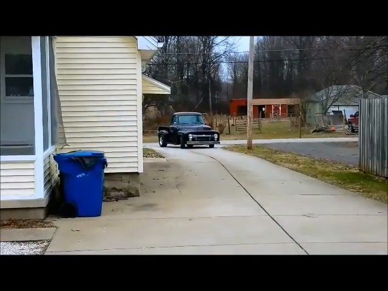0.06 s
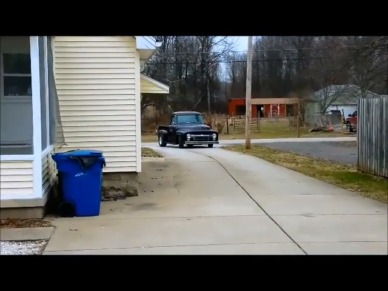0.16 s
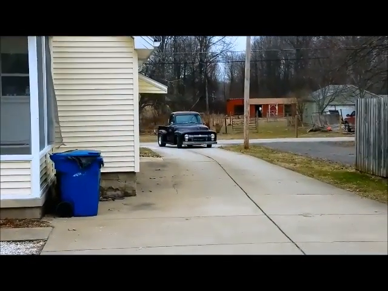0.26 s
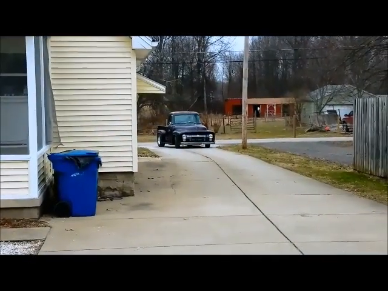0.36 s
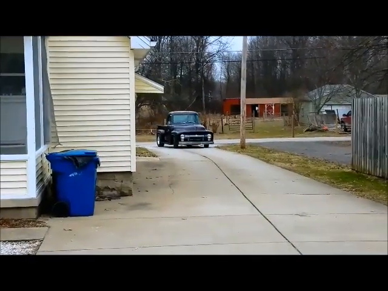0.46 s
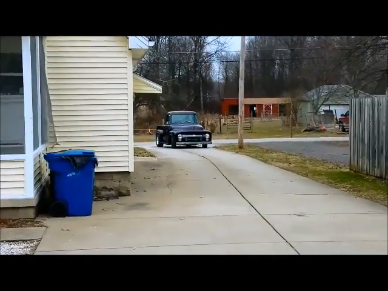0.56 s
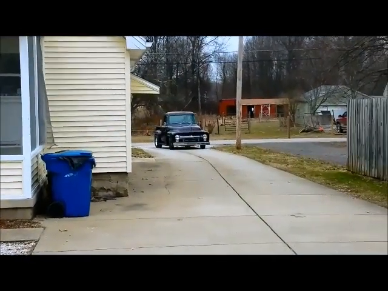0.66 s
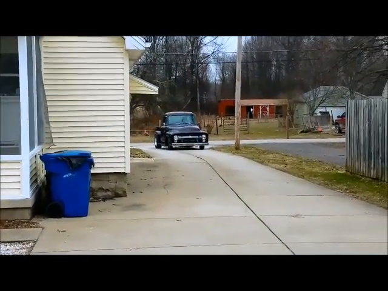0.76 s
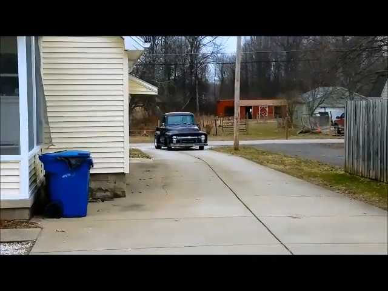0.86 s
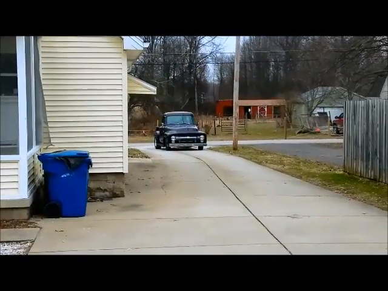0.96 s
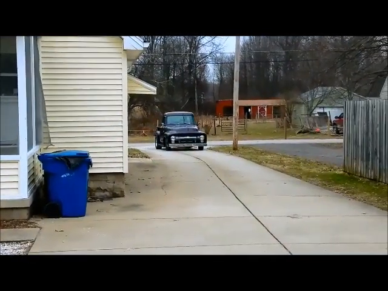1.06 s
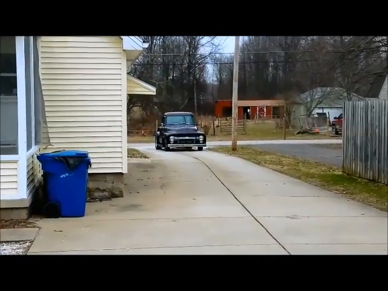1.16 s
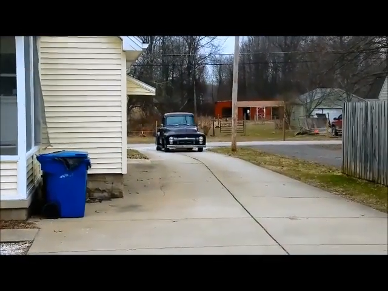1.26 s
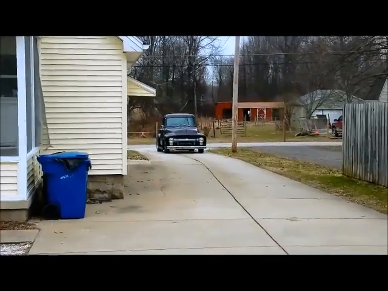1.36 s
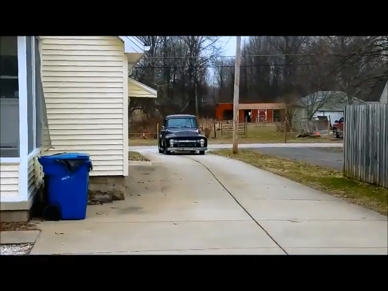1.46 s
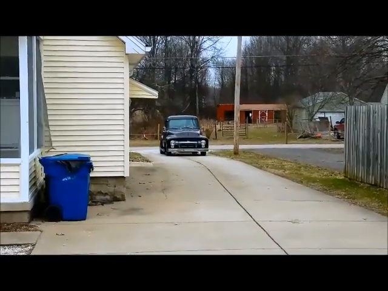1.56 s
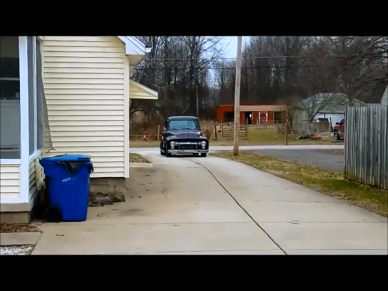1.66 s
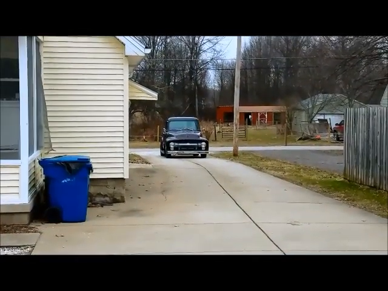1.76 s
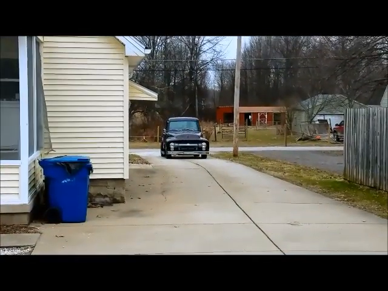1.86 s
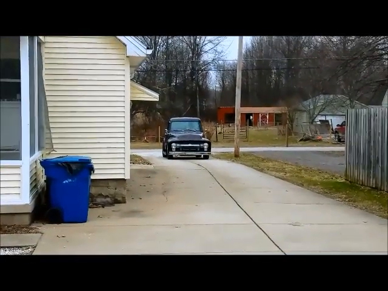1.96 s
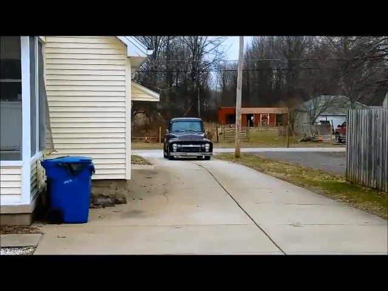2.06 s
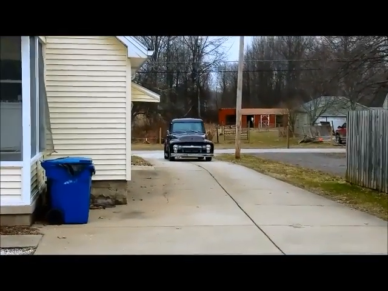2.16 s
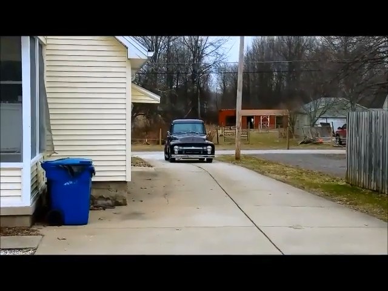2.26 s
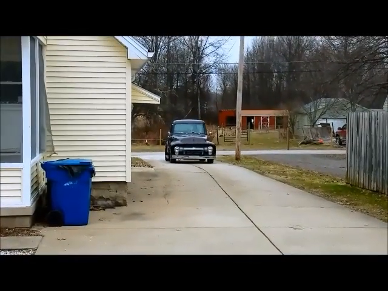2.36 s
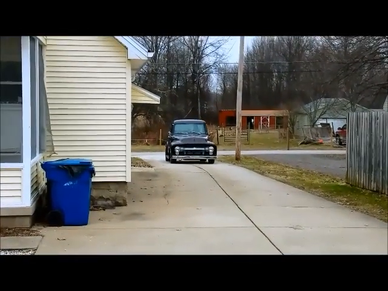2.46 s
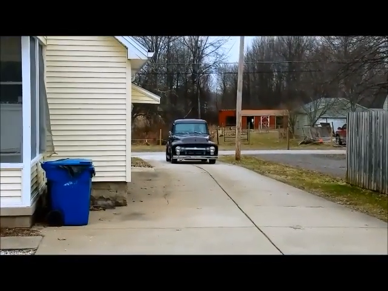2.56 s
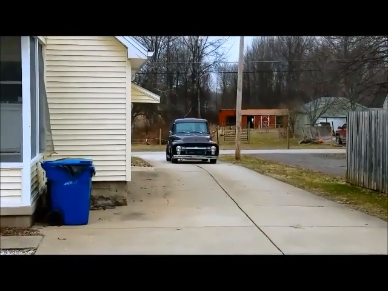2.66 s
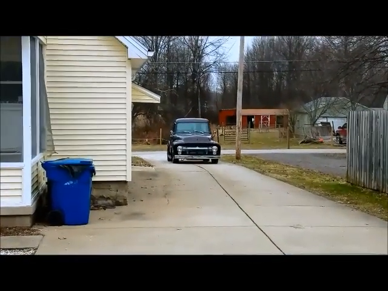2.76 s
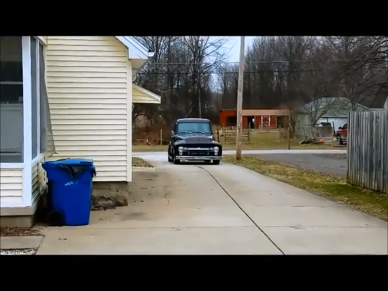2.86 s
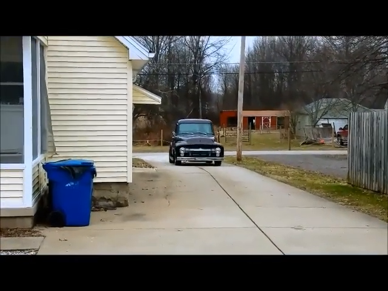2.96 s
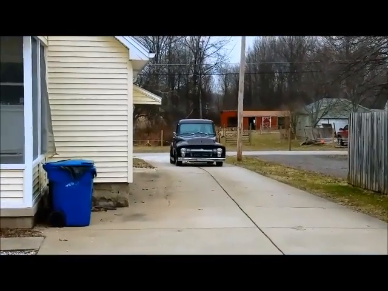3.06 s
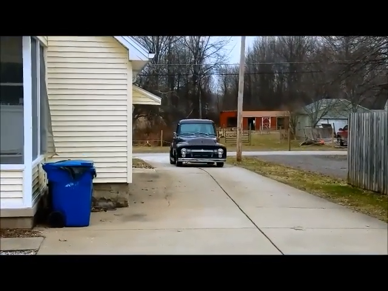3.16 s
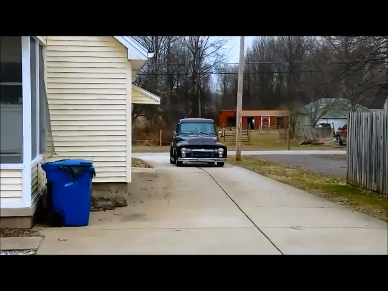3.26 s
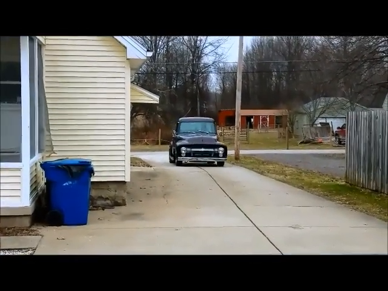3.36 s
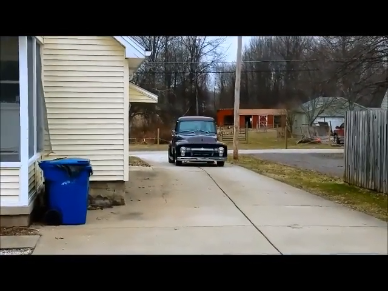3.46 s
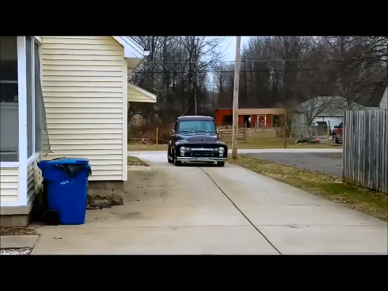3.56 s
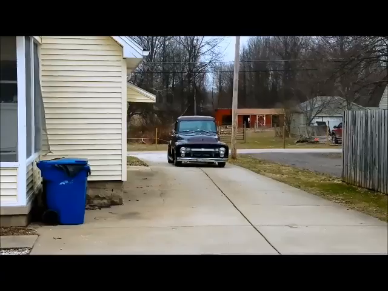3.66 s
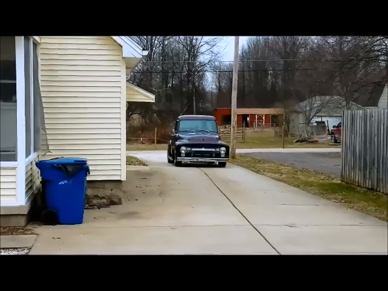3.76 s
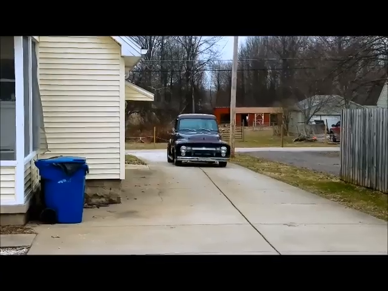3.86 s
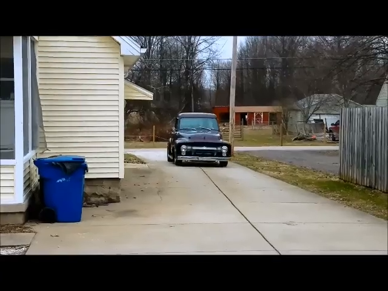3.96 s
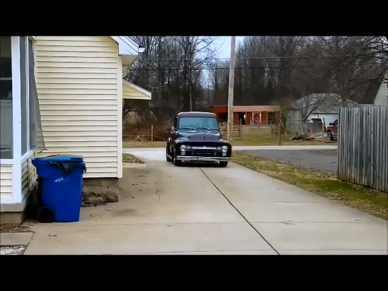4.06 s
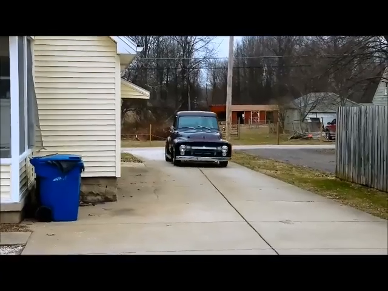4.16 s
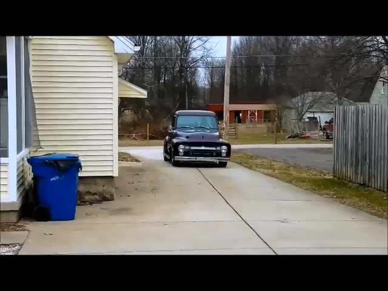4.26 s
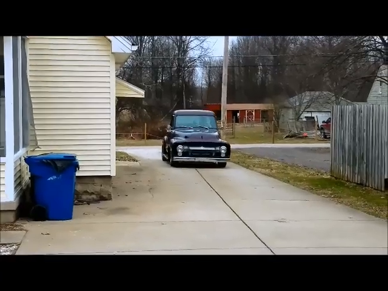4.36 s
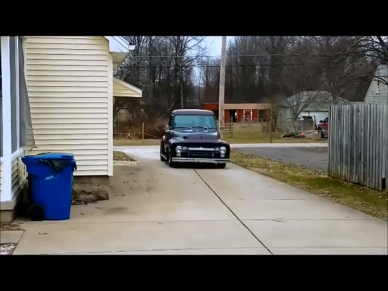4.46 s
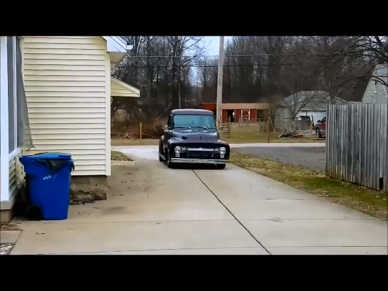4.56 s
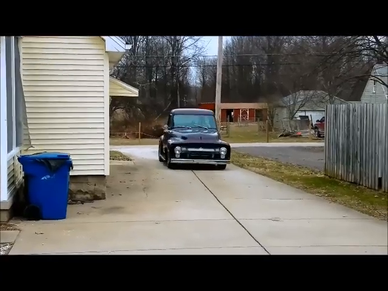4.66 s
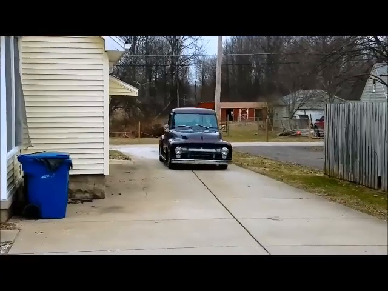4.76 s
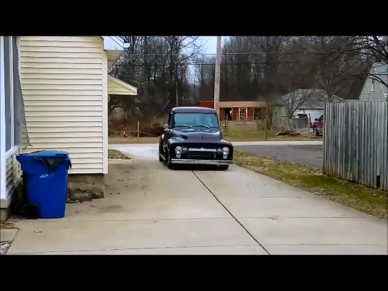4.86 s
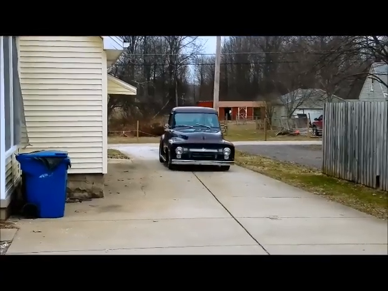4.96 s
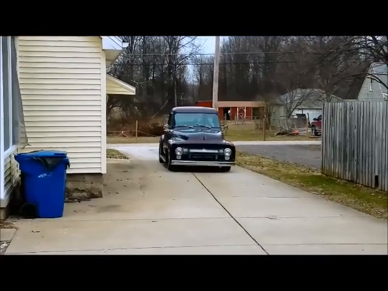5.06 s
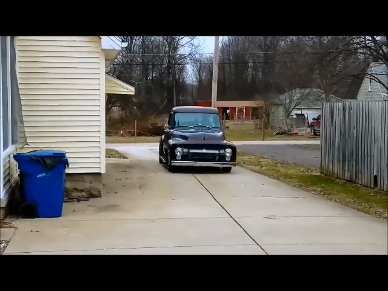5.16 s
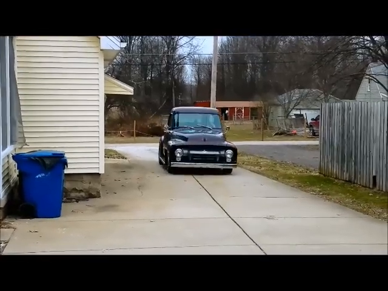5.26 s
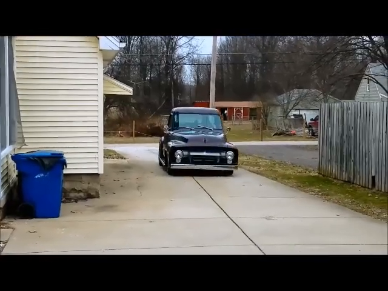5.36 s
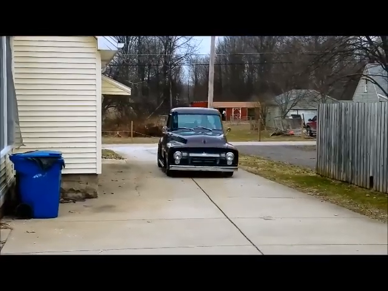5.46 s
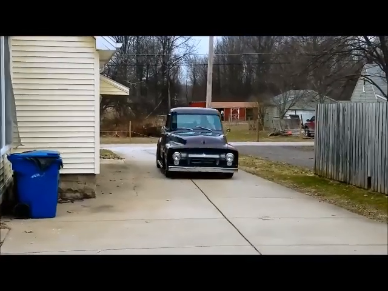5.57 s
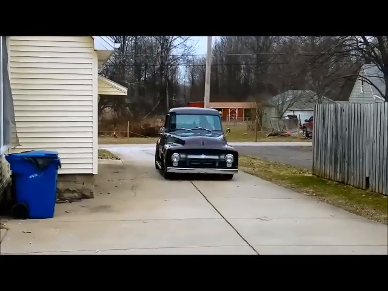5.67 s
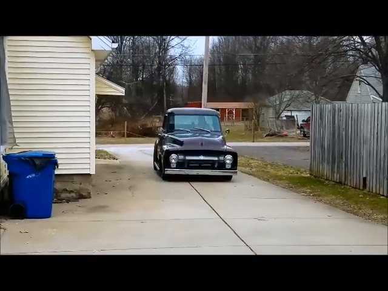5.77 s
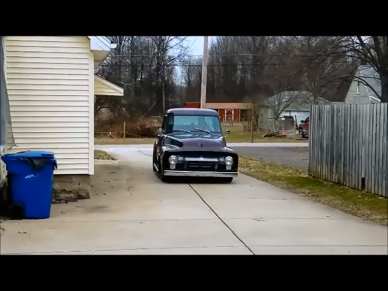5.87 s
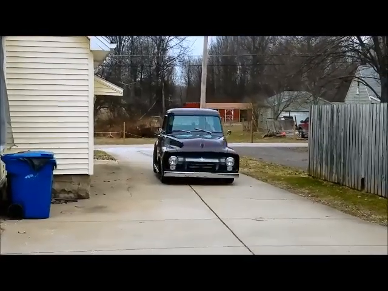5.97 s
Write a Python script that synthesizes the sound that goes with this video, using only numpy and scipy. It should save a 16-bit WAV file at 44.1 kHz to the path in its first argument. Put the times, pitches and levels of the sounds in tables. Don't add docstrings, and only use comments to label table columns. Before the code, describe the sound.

Deep uneven truck exhaust eases off, picks up and rolls closer over gritty concrete, a stone clicks early, and the throttle shuts with dull booms.

```python
import sys
import numpy as np
from scipy import signal
from scipy.fft import rfft, irfft, next_fast_len
from scipy.io import wavfile

SR = 44100
rng = np.random.default_rng(int(sys.argv[2]) if len(sys.argv) > 2 else 0)


def wav_out(sig):
    wavfile.write(sys.argv[1], SR, np.round(np.clip(np.atleast_2d(sig).T, -1, 1) * 32767).astype(np.int16))


def gain_from_db(level_db):
    decades = np.asarray(level_db, float) / 20
    return 10 ** decades


N = 265041

# (time [s], firing rate [1/s])
FIRING_RATE = [(0.0, 87.1), (0.2, 85.4), (0.4, 81.6), (0.8, 72.7), (1.0, 69.7), (1.2, 71.0), (1.4, 75.9),
               (1.8, 78.4), (2.0, 81.8), (2.8, 87.7), (3.4, 91.0), (4.0, 93.8), (4.5, 95.7), (5.29, 94.8),
               (5.4, 89.3), (5.5, 86.8), (5.7, 89.4), (6.0, 85.9)]
DISTANCE_M, ROLL_M_PER_S = 30, 2.6
THROTTLE_SHUT_S, THROTTLE_SPAN_S = 5.36, .08
COAST_END_S, COAST_SPAN_S = 1.47, 0.34

# (multiple of cycle rate [-], level [dB], change once the throttle shuts [dB])
CYCLE_HARMONICS = [(4, -7.1, 3.7), (5, -10.1, 8.9), (6, 3.2, 13.3), (7, -1.8, 6.5), (8, -0.0, -0.5),
                   (9, 2.8, -4.0), (10, 0.8, 1.8), (11, 4.1, 2.5), (12, 0.5, -8.3), (13, 5.9, 2.4),
                   (14, 6.1, 0.6), (15, 3.1, -9.8), (16, 4.4, 0.2), (17, 3.6, 2.8), (18, 0.7, -6.4),
                   (19, -0.9, -7.2), (20, -1.3, -0.8), (21, 5.9, -3.2), (22, 1.0, 3.5), (23, 1.3, -7.6),
                   (24, -4.4, 0.9), (25, -2.4, 1.5), (26, -3.3, -2.9), (27, -2.3, -1.4), (28, -4.3, 4.5),
                   (29, -2.6, -2.4), (30, -3.1, 2.3)]
CYLINDER_PUSH = [1.0, .3, 1.0, .35, .3, 1.0, .25, .3]
# (frequency [Hz], level [dB])
PIPE_RESPONSE = [(40, -8.3), (62, -8.2), (100, -0.7), (112, -5.0), (125, 7.6), (135, 8.9), (146, 6.3),
                 (158, 2.6), (172, 6.7), (188, 1.8), (205, 6.6), (225, -0.2), (260, -2.2), (360, -16.0)]
# (time [s], firing tone level [dB], bank burble level [dB])
EXHAUST_LEVELS = [(0.1, -45, -47.5), (0.4, -24.5, -49), (0.65, -23.5, -55), (0.85, -26.5, -50),
                  (1.0, -26, -48), (1.3, -26, -48.5), (1.66, -14.5, -46.5), (2.05, -23.5, -43.5),
                  (2.5, -27, -42), (2.65, -38, -41), (2.95, -26.5, -40.5), (3.2, -28, -43),
                  (3.55, -17.5, -45.5), (3.9, -20, -40), (4.4, -19.5, -36), (5.28, -18, -36),
                  (5.53, -24.5, -40), (5.7, -21.5, -38.5)]
# (firing rate [1/s], level [dB])
OVERTONE_FAVOUR = [(70, -53), (77, -35), (79, -36.5), (81.5, -42.5), (89.8, -50), (91.6, -36.5), (94, -37),
                   (95.4, -61)]
COAST_DB, OVERRUN_DB = -10.5, 5.5
UNEVEN_MIN_DB, UNEVEN_MAX_DB, UNEVEN_OVERRUN_DB = -51.5, -43, 5
STRONG_SPREAD, WEAK_SPREAD = .015, .31
ECHO_SHARE = .32
ECHO_MS, ECHO_CLOSES, ECHO_CLOSES_FASTER = 37.95, .535, .1215

# (frequency [Hz], width [Hz], level [dB])
RUMBLE_MODES = [(85, 30, -10), (135, 40, 0), (195, 60, -2), (260, 60, -12)]
RUMBLE_DB, RUMBLE_TRIM_DB, STUMBLE_DB_PER_S = -41.5, -1.5, 32
# (time [s], peak level [dB])
STUMBLES = [
    (1.68, -32),
    (3.2, -31),
    (4.25, -28),
    (5.75, -28),
]

FAN_PARTIALS = [12, 5.5, -8]
FAN_HZ = 252.7
FAN_START_DB, FAN_FOLLOWS, FAN_STEP_DB, FAN_STEP_S = -63, 0.84, 9, 2.07

# (frequency [Hz], level [dB per Hz])
BAY_SPECTRUM = [(150, -24.5), (260, -3.5), (298, -7.5), (371, -14.5), (455, -8), (505, -13), (579, -14),
                (687, -17), (1250, -23), (1400, -22), (1640, -26.5), (2180, -28), (3150, -32.5),
                (4000, -37), (5200, -72), (8800, -120)]
# (frequency [Hz], width [Hz], level [dB])
PANELS = [(705, 12.5, 0), (1335, 25, -6.5), (2215, 40, -10)]
BAY_DB, BAY_FOLLOWS = -42, 0.94

# (frequency [Hz], level [dB per Hz])
HISS_SPECTRUM = [(880, -53.5), (1500, 1), (1640, -6.5), (2160, -2), (2340, -7.5), (2500, -3.5), (2900, -6),
                 (3140, -5), (4180, -16.5), (5680, -11.5), (6980, -22.5), (8090, -19.5), (9480, -21.5),
                 (14900, -22.5), (15800, -20)]
# (frequency [Hz], level [dB per Hz])
GRIT_NEAR = [(880, -33), (1500, -12.5), (1710, -20), (2200, -2.5), (2760, -2), (2990, -5), (3500, -1),
             (3860, -4.5), (5730, -3), (6980, -19.5), (8500, -13.5), (14900, -15.5), (15800, -19)]
# (frequency [Hz], level [dB per Hz])
GRIT_FAR = [(880, -31), (1500, -9.5), (1610, -14), (1830, -3), (2410, -1), (3050, -8.5), (3540, -3),
            (4440, -9), (5460, -8.5), (6780, -23), (7630, -21.5), (11500, -27), (15800, -22)]
# (time [s], peak level [dB], hold [s])
SCUFFS = [(0.035, -57, 0.27), (0.465, -53, 0.034), (0.602, -56, 0.039), (0.712, -55.5, 0.11),
          (1.008, -60.5, 0.1), (1.653, -60, 0.045), (2.61, -57.5, .03), (3.283, -53.5, 0.059),
          (4.107, -51.5, 0.017), (4.222, -52, .05), (4.4, -51, 0.036), (4.637, -48.5, 0.032),
          (4.837, -50.5, 0.05), (4.923, -46, 0.019), (5.13, -47, 0.042), (5.509, -46, 0.034)]
ON_CONCRETE_S = 1.7
HISS_DB, HISS_RISE_DB, HISS_RISE_S, HISS_SPAN_S = -62.5, 9, 3.38, 2.25
GRIT_BED_DB, SCUFF_RISE_DB_PER_S, SCUFF_FALL_DB_PER_S = 0.7, 300, 129

# (delay [ms], share [-])
WALL_RETURNS = [(3.5, 0.13), (6.8, -0.16), (12.6, 0.086)]
RETURN_SWAY = .025

# (frequency [Hz], level [dB per Hz])
AIR_SPECTRUM = [(8, -9), (25, -6), (45, -12), (70, 8)]
AIR_DB = -48.5

# (time [s], peak level [dB], frequency [Hz], left-right [dB], body level [dB])
STONE_SNAPS = [(0.818, -42.5, 2400, 0.5, -12), (0.9967, -26, 2800, 3, -15), (1.0239, -28, 2700, 1, -5),
               (1.032, -36, 3100, -1, -8), (1.0612, -39, 2900, -2, -14), (1.1636, -37, 3270, -1, 2),
               (1.1636, -39, 6000, -6, -20), (1.167, -37, 3300, -6, -10), (1.194, -38, 3200, 0, -12),
               (2.5571, -36, 2430, 1, -17), (3.6204, -40, 2200, 6, 0), (4.9794, -41, 2730, -11, -10),
               (5.739, -44, 2610, 1.0, -10)]
SNAP_WIDTH = 0.41

# (time [s], peak level [dB], frequency [Hz])
LATE_BURNS = [
    (5.362, -19, 150),
    (5.392, -19, 160),
    (5.452, -16, 165),
]

# (frequency [Hz], left-right correlation [-])
PORT_LIKENESS = [(60, 0.39), (130, 0.76), (290, 0.93), (640, 0.94), (1410, 0.25), (3100, 0.84),
                 (6820, -0.29), (15000, -0.031)]
# (frequency [Hz], left-right [dB])
PORT_BALANCE = [(60, -2), (110, -3), (200, -1.5), (380, -2), (700, -2.5), (1290, 0), (2380, 4), (4400, -7),
                (8120, -4.5), (15000, 4.5)]
LEFT_LAG_S = 6e-5
STOP_S = .003


def in_time(rows):
    s, *columns = np.transpose(rows)
    return [np.interp(np.arange(N) / SR, s, column) for column in columns]


def at_hz(points, hz):
    x, y = np.array(points).T
    return np.interp(np.log(hz), np.log(x), y)


def ramp(middle_s, span_s):
    return np.clip((np.arange(N) / SR - middle_s) / span_s + .5, 0, 1)


def swells(bed_db, rows, rise, fall):
    t = np.arange(N) / SR
    for s, peak_db, *hold in rows:
        before = np.maximum(s - t, 0)
        after = np.maximum(t - s - sum(hold), 0)
        bed_db = np.maximum(bed_db, peak_db - rise * before - fall * after)
    return bed_db


def rms_one(x):
    return x / np.sqrt(np.mean(x ** 2) + 1e-20)


def drift(rate):
    r = np.exp(-80 * np.pi * rate / SR)
    coarse = rng.standard_normal(N // 40 + 2002)
    slow = signal.lfilter([1], [1, -2 * r, r * r], coarse)[2000:]
    return np.interp(np.arange(N) / 40, np.arange(len(slow)), rms_one(slow))


def resonance(x, hz, width_hz):
    r = np.exp(-np.pi * width_hz / SR)
    poles = [1, -2 * r * np.cos(2 * np.pi * hz / SR), r * r]
    return signal.lfilter([(1 - r * r) / 2, 0, (r * r - 1) / 2], poles, x)


def coloured(spectrum, grain_db):
    size = next_fast_len(N)
    hz = np.maximum(np.arange(size // 2 + 1) * SR / size, 1)
    sizes = gain_from_db(grain_db * np.minimum(rng.exponential(1, size), 4))
    mid, side = rfft(rng.standard_normal((2, size)) * sizes)
    alike = np.clip(at_hz(PORT_LIKENESS, hz), -1, 1)
    pair = np.sqrt(1 + alike) * mid + np.sqrt(1 - alike) * side * [[1], [-1]]
    inside = (hz > spectrum[0][0]) & (hz < spectrum[-1][0])
    return rms_one(irfft(pair * gain_from_db(at_hz(spectrum, hz)) * inside, size)[:, :N])


def exhaust(rate, firing_db, overtone_db, burble_db, uneven_db):
    t = np.arange(N) / SR
    turn = 2 * np.pi * (np.cumsum(rate / 8) / SR + .27)
    shut = ramp(THROTTLE_SHUT_S, THROTTLE_SPAN_S)
    echo_s = (ECHO_MS - ECHO_CLOSES * t - ECHO_CLOSES_FASTER * t ** 2) / 1000
    families = {0: overtone_db, 3: burble_db, 5: burble_db}
    out = np.zeros(N)
    for k, open_db, overrun_db in CYCLE_HARMONICS:
        hz = k * rate / 8
        family_db = firing_db if k == 8 else families.get(k % 8, uneven_db)
        pattern = np.sum(CYLINDER_PUSH * np.exp(-2j * np.pi * k * np.arange(8) / 8))
        weak = int(k % 8 not in families)
        wander_db = (.7 + 1.6 * weak) * drift(3.0)
        slip = (.1 + .18 * weak) * drift(2.0)
        level_db = open_db + shut * overrun_db + family_db + at_hz(PIPE_RESPONSE, hz)
        level_db = level_db + wander_db + 0.13 * (k > 9)
        both = np.abs(1 + (k > 8) * ECHO_SHARE * np.exp(2j * np.pi * hz * echo_s))
        spread = WEAK_SPREAD if weak else STRONG_SPREAD
        phase = k * turn + np.angle(pattern) - spread * (k - 8) ** 2 + slip
        out += np.sqrt(2) * gain_from_db(level_db) * both * np.cos(phase)
    return out


def rumble(rate, level_db):
    fired = np.diff(np.floor(np.cumsum(rate) / SR), prepend=0)
    puffs = fired * rng.standard_normal(N) + 0.052 * rng.standard_normal(N)
    rings = np.zeros(N)
    for k, (hz, width_hz, db) in enumerate(RUMBLE_MODES):
        ring = resonance(resonance(puffs, hz, width_hz * 2.0), hz, width_hz * 2.0)
        rings += gain_from_db(db) * (-1) ** k * ring
    return gain_from_db(level_db + RUMBLE_TRIM_DB) * rms_one(rings / rate ** .5)


def fan(level_db):
    t = np.arange(N) / SR
    out = np.zeros(N)
    for k, db in enumerate(FAN_PARTIALS, start=1):
        level = np.sqrt(2) * gain_from_db(level_db + db + .7 * drift(4.0))
        out += level * np.cos(2 * np.pi * FAN_HZ * k * t + .06 * drift(3.0))
    return out


def engine_bay(rate, bay_db):
    throb = 1 + 0.035 * np.cos(2 * np.pi * np.cumsum(rate * 3 / 8) / SR)
    rush = gain_from_db(bay_db + 1.24 * drift(26)) * throb * coloured(BAY_SPECTRUM, grain_db=3.0)
    return rush + sum(gain_from_db(db) * resonance(rush, hz, width_hz) for hz, width_hz, db in PANELS)


def tyres(hiss_db):
    total_db = swells(hiss_db + GRIT_BED_DB, SCUFFS, SCUFF_RISE_DB_PER_S, SCUFF_FALL_DB_PER_S)
    grit = np.sqrt(np.maximum(gain_from_db(2 * total_db) - gain_from_db(2 * hiss_db - 1.5), 0))
    shimmer = gain_from_db(.6 * drift(20))
    hiss = gain_from_db(hiss_db + 7.0) * shimmer * coloured(HISS_SPECTRUM, grain_db=1.0)
    flicker = gain_from_db(1.1 * drift(60))
    far = np.arange(N) / SR < ON_CONCRETE_S
    far_grains = gain_from_db(2.5) * coloured(GRIT_FAR, grain_db=1.5)
    grains = np.where(far, far_grains, coloured(GRIT_NEAR, grain_db=1.5))
    return hiss + grit * gain_from_db(5.0) * flicker * grains


def nearby_walls(x):
    i = np.arange(N)
    out = x
    for ms, share in WALL_RETURNS:
        lag = ms * SR / 1000 * (1 + RETURN_SWAY * drift(.5))
        out = out + share * x[:, np.maximum(i - lag, 0).astype(int)]
    return out


def low_air(bay_db):
    return gain_from_db(AIR_DB + .8 * (bay_db + 40)) * coloured(AIR_SPECTRUM, grain_db=0)


def stones():
    out, length = np.zeros((2, N)), 600
    for s, peak_db, hz, pan_db, body_db in STONE_SNAPS:
        click = np.zeros(length)
        click[[0, 75]] = 1, .25
        bright = resonance(resonance(click, hz, SNAP_WIDTH * hz), hz, SNAP_WIDTH * hz)
        body = resonance(resonance(click, 1300, 900), 1300, 900)
        ring = bright / np.abs(bright).max() - gain_from_db(body_db) * body / np.abs(body).max()
        i = round(s * SR)
        out[:, i:i + length] -= gain_from_db(peak_db) * ring * gain_from_db([[pan_db / 2], [-pan_db / 2]])
    return out


def pops():
    out, t = np.zeros(N), np.arange(2600) / SR
    envelope = (t / 0.0075) * np.exp(1 - t / 0.0095)
    for s, peak_db, hz in LATE_BURNS:
        i = round(s * SR)
        out[i:i + len(t)] += gain_from_db(peak_db) * np.sin(2 * np.pi * hz * t) * envelope
    return out


def scene():
    rate, = in_time(FIRING_RATE)
    firing_db, burble_db = in_time(EXHAUST_LEVELS)
    distance_m = DISTANCE_M - ROLL_M_PER_S * np.arange(N) / SR
    near_db = 20 * np.log10(DISTANCE_M / distance_m)
    shut = ramp(THROTTLE_SHUT_S, THROTTLE_SPAN_S)
    coasting = 1 - ramp(COAST_END_S, COAST_SPAN_S)
    overtone_db = at_hz(OVERTONE_FAVOUR, rate) + near_db + COAST_DB * coasting + OVERRUN_DB * shut
    uneven_db = np.clip(burble_db, UNEVEN_MIN_DB, UNEVEN_MAX_DB) + UNEVEN_OVERRUN_DB * shut
    rumble_db = swells(RUMBLE_DB + 0.47 * near_db, STUMBLES, STUMBLE_DB_PER_S, STUMBLE_DB_PER_S)
    fan_db = FAN_START_DB + FAN_FOLLOWS * near_db + FAN_STEP_DB * ramp(FAN_STEP_S, 0.2)
    bay_db = BAY_DB + BAY_FOLLOWS * near_db
    hiss_db = HISS_DB + HISS_RISE_DB * ramp(HISS_RISE_S, HISS_SPAN_S)

    engine = exhaust(rate, firing_db, overtone_db, burble_db, uneven_db)
    engine = engine + rumble(rate, rumble_db) + fan(fan_db) + pops()
    rush = nearby_walls(engine_bay(rate, bay_db) + tyres(hiss_db))
    return engine + rush + low_air(bay_db) + stones()


def low_pass(x):
    return signal.sosfilt(signal.butter(12, 15970, fs=SR, output="sos"), x)


def record(dry):
    margin = 2048
    wide = np.pad(dry, [(0, 0), (margin, margin)], "reflect", reflect_type="odd")
    size = next_fast_len(wide.shape[1])
    hz = np.maximum(np.arange(size // 2 + 1) * SR / size, 1)
    tilt = gain_from_db(at_hz(PORT_BALANCE, hz) / 2)
    ports = np.array([tilt * np.exp(-2j * np.pi * hz * LEFT_LAG_S), 1 / tilt])
    heard = irfft(rfft(wide, size) * ports, size)[:, margin:margin + N]
    closing = np.sin(np.pi / 2 * (1 - ramp(N / SR - STOP_S / 2, STOP_S)))
    return low_pass(heard * closing)


dry = scene()
out = record(dry)
wav_out(out)
```